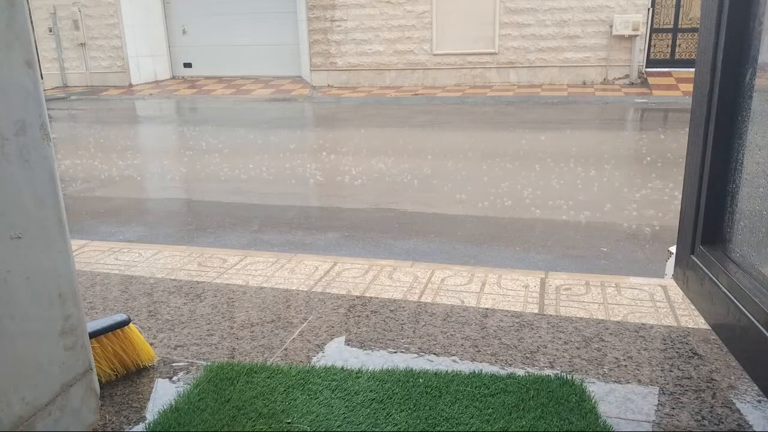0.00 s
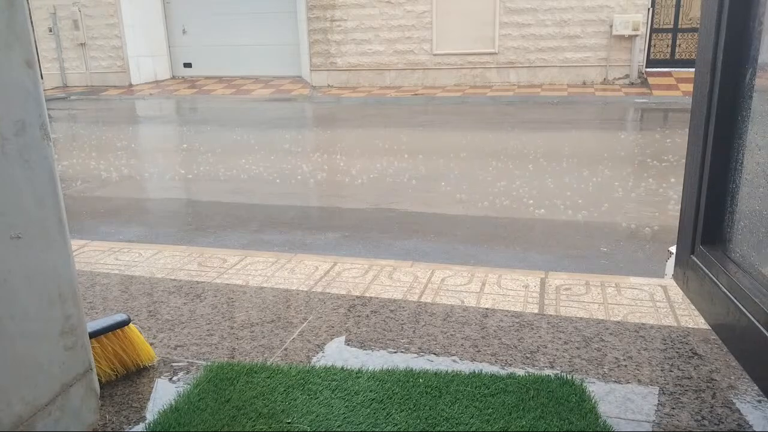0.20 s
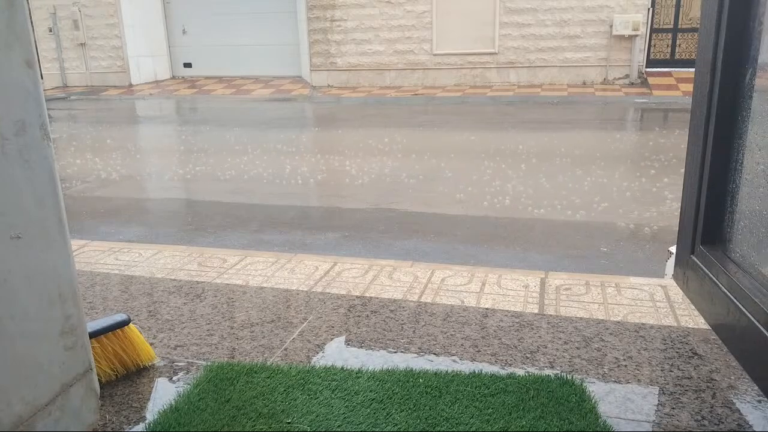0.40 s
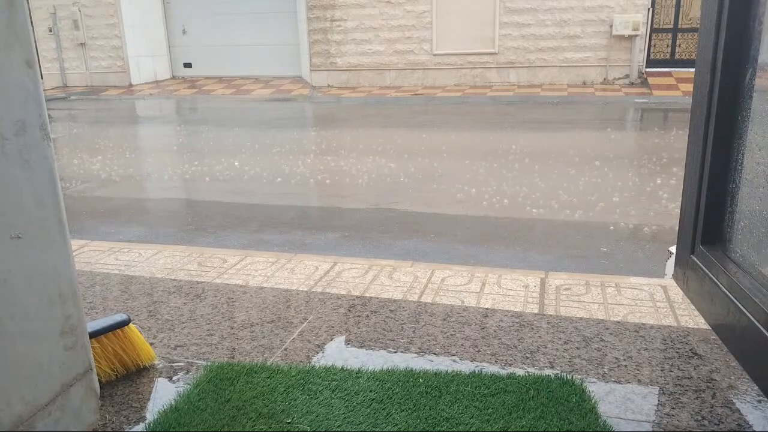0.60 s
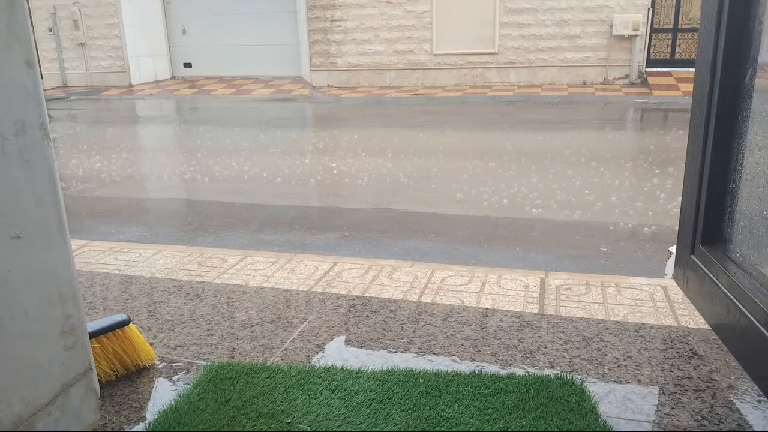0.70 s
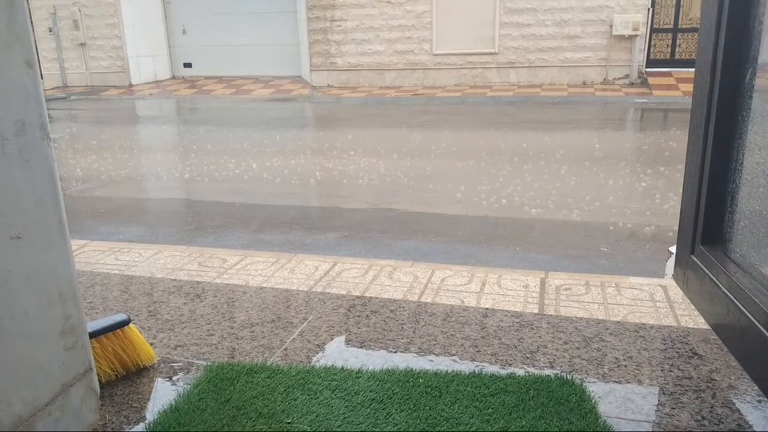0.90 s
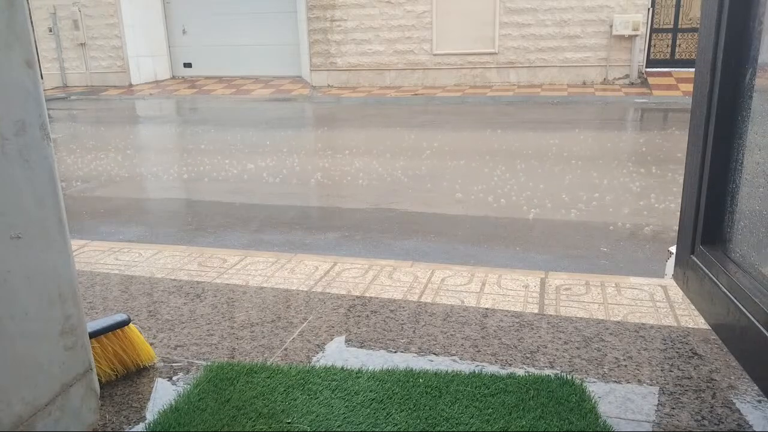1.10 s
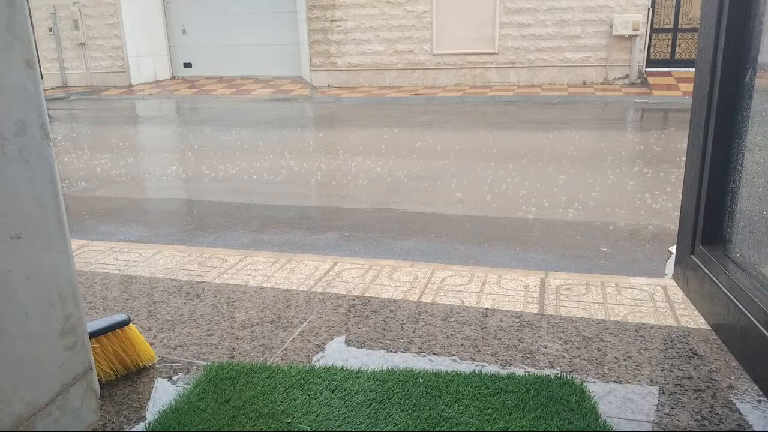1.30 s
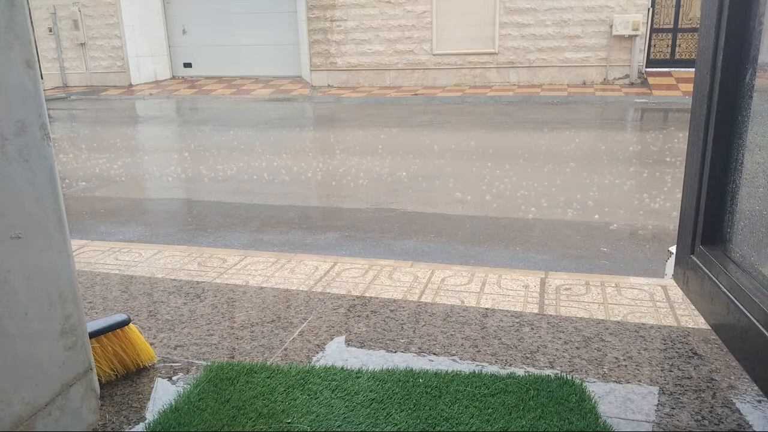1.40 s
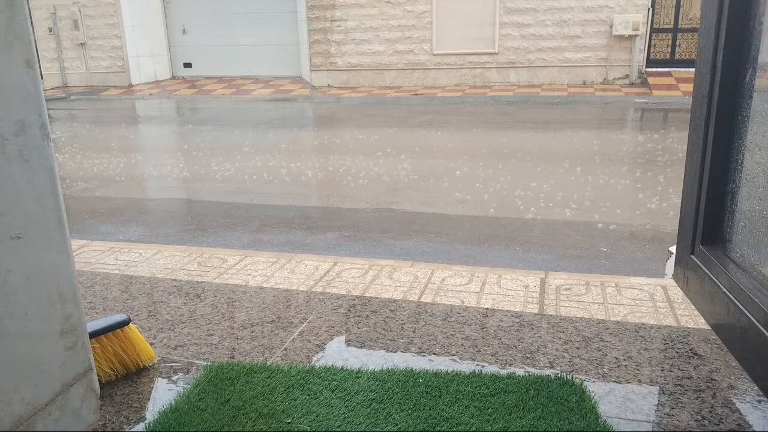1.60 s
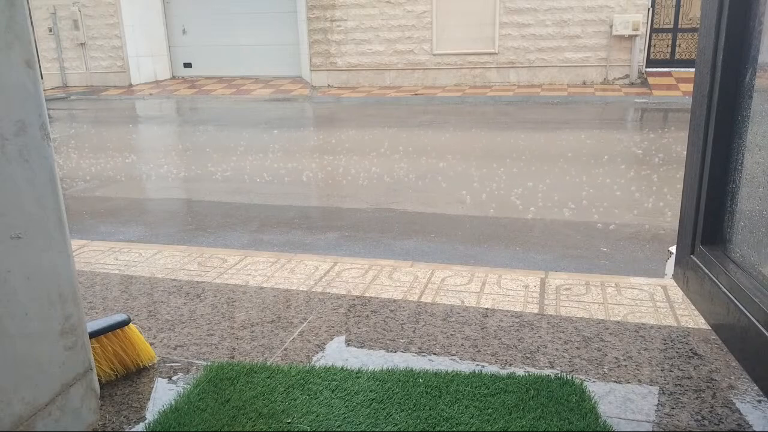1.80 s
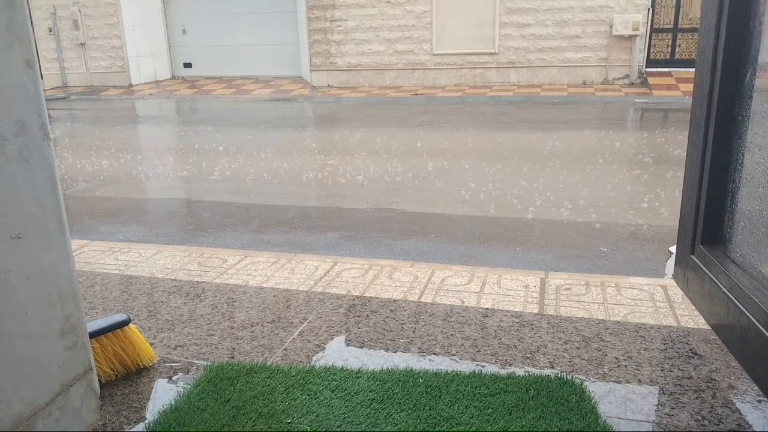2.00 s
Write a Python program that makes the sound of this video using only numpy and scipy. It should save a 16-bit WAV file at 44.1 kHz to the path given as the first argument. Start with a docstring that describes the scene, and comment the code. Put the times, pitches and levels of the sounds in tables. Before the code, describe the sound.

Dense rain hiss fills the whole moment, with small close splashes; a hollow object thumps once near the start, while far thunder swells and fades, captured in mono by a phone just inside a doorway.

```python
"""Heavy rain on a paved street, heard by a mono phone from a doorway: random clicks merge into a noise wash.
Thunder rolls far off as flickering noise bands, with a narrow boom wandering in pitch beneath them.
Nearer splashes patter as short noise bursts; a hollow object's modes ring to a knock and its rattle.
The phone's noise suppressor ducks the steady sound below about 2.3 kHz and opens for louder moments."""
import sys
import numpy as np
from scipy import signal
from scipy.fft import rfft, irfft
from scipy.io import wavfile
from scipy.ndimage import uniform_filter1d

SR = 44100
rng = np.random.default_rng(int(sys.argv[2]) if len(sys.argv) > 2 else 0)


def log_audio(samples):
    """Write samples as a 16-bit WAV file to the path given in sys.argv[1]."""
    # one column per channel
    frames = np.atleast_2d(samples).T
    # limit to full scale, then quantise
    limited = np.clip(frames, -1, 1)
    pcm = np.round(limited * 32767).astype(np.int16)
    wavfile.write(sys.argv[1], SR, pcm)


N = 92610

EDGE_HZ = 2337  # upper edge of the suppressor; the rain flickers more below it


def undb(db):
    """dB to gain."""
    return 10 ** (np.asarray(db) / 20)


def level(x, db):
    """Scale to an rms level in dB."""
    return x * undb(db) / np.sqrt(np.mean(x ** 2))


def on_hz(table, hz):
    """Read a (Hz, dB) table on a log-frequency axis."""
    t = np.array(table, float)
    return np.interp(np.log(np.maximum(hz, 1)), np.log(t[:, 0]), t[:, 1])


def band(x, lo_hz, hi_hz, table):
    """One coloured slice of x whose sine-shaped edges meet at its centre."""
    hz = np.arange(N // 2 + 1) * SR / N
    above_low = np.log(np.maximum(hz, 1) / lo_hz)
    below_high = np.log(hi_hz / np.maximum(hz, 1))
    edge = np.clip(np.minimum(above_low, below_high) / np.log(hi_hz / lo_hz) * 2, 0, 1)
    gain = np.sin(edge * np.pi / 2) * undb(on_hz(table, hz))
    return irfft(rfft(x) * gain, N)


def walk(rate_hz):
    """Random levels held 1 / rate_hz seconds, smoothed twice; spread about 0.4."""
    k = int(SR / rate_hz)
    held = np.repeat(rng.standard_normal(N // k + 1), k)
    return 0.5 * uniform_filter1d(uniform_filter1d(held, k), k)[:N]


def even(x):
    """Partly flatten the slow chance swells of a noise."""
    steadiness, window_s = 0.55, 0.26  # a steadiness of 1 would level it fully
    power = uniform_filter1d(x ** 2, int(window_s * SR))
    return x / (power + 1e-18) ** (steadiness / 2)


def rain():
    """Dense drop clicks over a smooth wash; narrow bands swell together and flicker alone."""
    # Colour of the rain. Each row: frequency in Hz, relative density in dB per Hz.
    rain_colour = [(60, -20), (250, -6.5), (450, 0), (800, -5), (1050, -12), (2000, -3.5), (2700, 0),
                   (3700, -3), (5000, -4.5), (6300, -4), (6700, -1.5), (7950, -0.5), (8040, 6.5), (8200, 0),
                   (9000, -0.5), (9300, -3.5), (11800, -7), (12100, -2.5), (15550, -3.5), (15620, 0.5)]
    drops_per_s, rain_db = 13000, -48.5
    swell_db, flicker_db, low_flicker_db = 0.14, 2.74, 4  # dB per unit of walk
    drops = (rng.random(N) < drops_per_s / SR) * rng.standard_normal(N)
    sheet = level(rng.standard_normal(N), 0) + level(drops, 1.0)
    out, swell = 0, walk(11.38)
    for hz in 50 * 2 ** (np.arange(52) / 6):
        own_db = low_flicker_db if hz < EDGE_HZ else flicker_db
        gain = undb(swell_db * swell + own_db * walk(21.59))
        out = out + gain * band(sheet, hz / 2 ** (1 / 6), hz * 2 ** (1 / 6), rain_colour)
    return level(out, rain_db)


def thunder():
    """A far roll of flickering noise bands: throbbing bass, and an upper rumble that comes and goes."""
    # Colour of the far thunder. Each row: frequency in Hz, relative density in dB per Hz.
    thunder_colour = [(24, -58), (40, -70), (67, -9.5), (97, -8.5), (140, -9.5), (203, -11.5), (267, -18),
                      (320, -18.5), (368, -9), (479, -13.5), (598, -15), (649, -17), (860, -20.5),
                      (1000, -37.5), (1100, -31), (1430, -97), (2420, -120)]
    # Course of the roll. Each row: time in seconds, level in dB, upper rumble relative to it in dB.
    roll = np.array([(0.0, -66, -18), (0.13, -67.5, 13.5), (0.16, -53, 3), (0.212, -61.5, 0),
                     (0.23, -47.5, 7.5), (0.33, -51, 9.5), (0.38, -45.5, -3), (0.55, -42, -9.5),
                     (0.57, -46, -5), (0.67, -48.5, 0.5), (0.76, -42.5, -10), (0.961, -42.5, -4.5),
                     (0.98, -41.5, -6), (1.02, -42, -6), (1.149, -44.5, -8.5), (1.19, -43.5, -9.5),
                     (1.4, -46, -8.5), (1.429, -45.5, -4.5), (1.62, -44.5, -6), (1.909, -55, -1),
                     (1.96, -68, 13), (1.99, -56.5, 3), (2.06, -53, -4.5), (2.1, -51, -5.5)], float)
    upper_hz, lower_trim_db, upper_trim_db = 330, -2.5, -1.5
    flicker_db = 2.07  # dB per unit of walk
    t = np.arange(N) / SR
    low = upper = 0
    for hz in 40 * 2 ** (np.arange(17) / 3):
        noise = band(rng.standard_normal(N), hz / 2 ** (1 / 3), hz * 2 ** (1 / 3), thunder_colour)
        part = undb(flicker_db * walk(15.0)) * noise
        if hz < upper_hz:
            low = low + part
        else:
            upper = upper + part
    roll_db = np.interp(t, roll[:, 0], roll[:, 1])
    upper_db = roll_db + np.interp(t, roll[:, 0], roll[:, 2])
    bass = level(even(low), lower_trim_db) * undb(roll_db)
    return bass + level(even(upper), upper_trim_db) * undb(upper_db)


def boom():
    """The roll's deepest boom: a narrow, wavering band of pressure that wanders in pitch and surges."""
    # Path of the boom. Each row: time in seconds, pitch in Hz, level in dB.
    path = np.array([(0.14, 88.4, -71), (0.16, 88, -52.5), (0.314, 90.1, -48.5), (0.368, 92, -43),
                     (0.516, 90.2, -49), (0.538, 92, -48.5), (0.586, 109.4, -47), (0.636, 113.1, -51),
                     (0.712, 106.6, -55), (0.75, 104.5, -40.5), (0.8, 105, -50.5), (0.832, 98.2, -35),
                     (0.86, 96.2, -53), (0.936, 102.9, -38), (0.99, 103.4, -61), (1.024, 102.4, -38.5),
                     (1.084, 99.6, -46.5), (1.144, 104.3, -53), (1.16, 103.9, -50), (1.264, 101.4, -44.5),
                     (1.324, 107.9, -58), (1.372, 125, -44), (1.4, 125.5, -50), (1.444, 123, -69),
                     (1.52, 101.8, -50), (1.558, 93, -45), (1.592, 95.9, -44.5), (1.662, 94.2, -52),
                     (1.694, 101.2, -46), (1.728, 114.2, -53), (1.82, 125.1, -63), (1.88, 121.4, -73),
                     (1.952, 102.5, -77), (1.99, 93, -57), (2.028, 87, -49.5), (2.1, 88.2, -54)], float)
    drift_hz, steadiness, trim_db = 22.8, 0.94, -0.5  # drift smoothed twice over 1 / drift_hz seconds
    t = np.arange(N) / SR
    k = int(SR / drift_hz)
    drift = [uniform_filter1d(uniform_filter1d(rng.standard_normal(N), k), k) for _ in range(2)]
    waver = drift[0] + 1j * drift[1]
    waver = waver / (np.abs(waver) + 1e-9) ** steadiness  # mostly phase is left wandering
    cycles = np.cumsum(np.interp(t, path[:, 0], path[:, 1])) / SR
    tone = np.real(waver * np.exp(2j * np.pi * cycles))
    return level(tone, trim_db) * undb(np.interp(t, path[:, 0], path[:, 2]))


def splashes():
    """Nearer bursts of spatter, each a band of noise: quick rise, hold, short fade."""
    # Nearer splashes. Each row: start in seconds, rms level of the unshaped noise in dB, centre in Hz,
    # reach to either side in Hz, length in seconds.
    splash_list = [(0.059, -60.5, 703, 148, 0.041), (0.076, -54.5, 440, 81, 0.043),
                   (0.166, -57, 670, 250, 0.073), (0.173, -65, 1110, 150, 0.071),
                   (0.36, -56, 1600, 920, 0.073), (0.452, -56, 1450, 150, 0.031),
                   (0.532, -57, 1547, 294, 0.13), (0.553, -60.5, 1170, 200, 0.075),
                   (0.554, -55.5, 2270, 450, .04), (0.643, -58, 12100, 4000, 0.018),
                   (0.661, -57.5, 1434, 197, 0.064), (0.767, -61, 1516, 149.6, 0.034),
                   (0.881, -51, 3640, 1310, 0.029), (0.883, -55, 1570, 354.7, 0.077),
                   (0.888, -57.5, 1930, 300, 0.11), (0.939, -63, 1136, 115.7, 0.097),
                   (1.085, -53.5, 8250, 2500, 0.01), (1.142, -61, 2460, 400, 0.078),
                   (1.195, -59, 1450, 310, 0.039), (1.212, -53, 923, 110, 0.033),
                   (1.223, -58, 986, 140, 0.096), (1.314, -56, 1127, 143, 0.12),
                   (1.332, -56.5, 900, 160.4, 0.09), (1.321, -55, 4340, 2000, 0.039),
                   (1.32, -62, 1526, 118.6, 0.079), (1.328, -59, 2000, 348, 0.082),
                   (1.499, -62, 1896, 200, 0.074), (1.64, -52.5, 8700, 4980, 0.027),
                   (1.678, -61.5, 2140, 199, 0.092), (1.711, -65.5, 1560, 80, 0.038),
                   (1.796, -59.5, 736, 119, 0.23), (1.923, -60.5, 497, 102, 0.22),
                   (1.849, -60, 2545, 403, 0.032), (1.927, -57, 1593, 89.5, 0.026),
                   (1.954, -60, 1455, 79.3, 0.039), (1.982, -59, 1334, 80, 0.023),
                   (1.995, -64, 1150, 130, 0.068)]
    rise_s, fade_power = 0.0024, 3.35  # a higher power holds longer and ends sharper
    t, out = np.arange(N) / SR, 0
    flat = [(20, 0), (20000, 0)]
    for s, db, hz, reach_hz, length_s in splash_list:
        spray = band(rng.standard_normal(N), max(hz - reach_hz, 100), hz + reach_hz, flat)
        rise = np.clip((t - s) / rise_s, 0, 1)
        fade = np.exp(-(np.maximum(t - s, 0) / length_s) ** fade_power)
        out = out + level(even(spray), db) * rise * fade
    return out


def crackle(push):
    """Noise burst at each blow with a quick decay and a longer echo in the doorway."""
    # Colour of the crackle. Each row: frequency in Hz, relative density in dB per Hz.
    crackle_colour = [(700, -15), (1200, 5), (2000, 2), (3000, -5.5), (4300, -9), (5500, -27)]
    noise_db, t60_s, echo_db, echo_t60_s = -37.5, 0.049, -15.5, 0.57
    u = np.arange(SR // 2) / SR
    fade = undb(-60 * u / t60_s) + undb(echo_db - 60 * u / echo_t60_s)
    noise = level(band(rng.standard_normal(N), 380, 9300, crackle_colour), noise_db)
    # the square root makes light blows crackle more for their strength
    return noise * signal.fftconvolve(push ** 0.5, fade)[:N]


def knock():
    """Blows and a dying rattle ring the hollow object's modes; each blow also crackles."""
    # Modes of the hollow object. Each row: frequency in Hz, level in dB, 60 dB decay in seconds.
    modes = [(375, -20, .08), (434.5, -3.5, .13), (530, -9, .07), (644, 2, .05), (720, -26, .08),
             (830, -21, .1), (1143, -23, .12), (1209, -23, .12), (1259, -29, .08), (1540, -28, .09),
             (1628, -28, .09), (2065, -23, .13), (2518, -34, .05), (3155, -33, .06)]
    # Blows of the knock. Each row: time in seconds, strength in dB.
    blows = [(.2236, -43), (.2280, -31), (.2299, -28), (.2317, -28), (.2332, -32), (.2365, -30.5),
             (.2409, -31.5), (.2460, -30.5), (.2513, -35.5), (.2532, -35), (.2595, -40), (.2688, -35.5),
             (.2783, -37), (.2956, -36), (.3006, -39), (.3053, -31), (.3122, -39), (.3216, -37),
             (.3331, -43)]
    rattle_db, rattle_t60_s, body_low_hz = -71, 0.5, 340
    t, push = np.arange(N) / SR, np.zeros(N)
    for s, db in blows:
        push[int(s * SR)] += undb(db)
    crackling = crackle(push)
    start = blows[1][0]  # the rattle sets in with the second blow
    rattle_fade = undb(rattle_db - 60 * np.maximum(t - start, 0) / rattle_t60_s)
    push += (t > start) * rattle_fade * rng.standard_normal(N)
    u = t[:SR // 2]
    ring = sum(undb(db - 60 * u / t60_s) * np.sin(2 * np.pi * hz * u) for hz, db, t60_s in modes)
    low_cut = signal.butter(3, body_low_hz, "high", fs=SR, output="sos")
    body = signal.sosfilt(low_cut, signal.fftconvolve(push, ring)[:N])
    return body + crackling


def scene():
    """One microphone in the doorway: both channels alike."""
    mono = rain() + thunder() + boom() + splashes() + knock()
    return np.array([mono, mono])


def suppress(x):
    """Noise suppressor: ducks each low band while its smoothed level stays near the learnt noise."""
    # Learnt noise. Each row: frequency in Hz, level in dB per band.
    learnt = [(60, -84), (300, -66), (700, -65), (1100, -83), (1600, -62.5), (2200, -67.5)]
    cut_scale_db, softness_db, smooth_s = -17, 4, 0.03  # far below the learnt noise the cut is half the scale
    hz, _, z = signal.stft(x, SR, nperseg=512, noverlap=384)
    power = uniform_filter1d(np.abs(z) ** 2, size=2, axis=0) * 2  # sum of two neighbouring bins
    power = uniform_filter1d(power, max(int(smooth_s * SR / 128), 1), axis=1)
    above_db = 10 * np.log10(power + 1e-14) - on_hz(learnt, hz)[:, None]
    cut_db = cut_scale_db / (2.0 + np.exp(np.clip(above_db / softness_db, -30, 30)))
    reach = np.clip((EDGE_HZ - hz) / 150 + 0.5, 0, 1)[:, None]
    return signal.istft(z * undb(cut_db * reach), SR, nperseg=512, noverlap=384)[1][:N]


def low_pass(x):
    """Removes everything above the highest recorded frequency."""
    return signal.sosfilt(signal.butter(12, 16900, fs=SR, output="sos"), x)


def record(dry):
    """The phone's microphone path: bass cut, noise suppressor, steep top cut."""
    low_cut_hz, top_hz = 75, 15720
    bass_cut = signal.butter(2, low_cut_hz, "high", fs=SR, output="sos")
    top_cut = signal.ellip(16, 0.5, 60, top_hz, fs=SR, output="sos")
    x = suppress(signal.sosfilt(bass_cut, dry[0]))
    x = signal.sosfilt(top_cut, x)
    return low_pass(np.array([x, x]))


dry = scene()
out = record(dry)
log_audio(out)
```